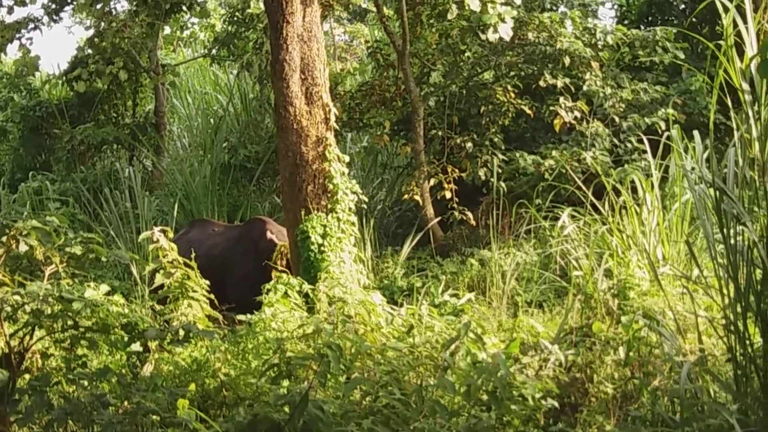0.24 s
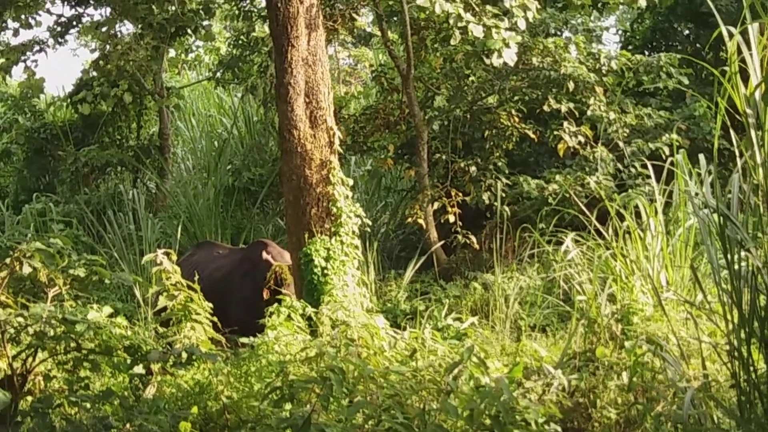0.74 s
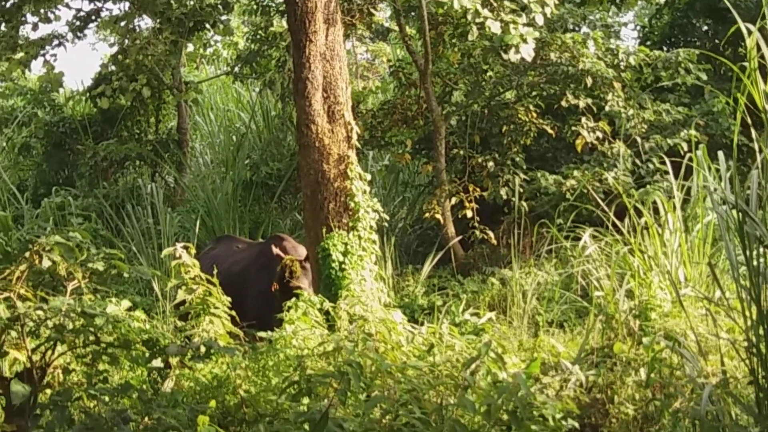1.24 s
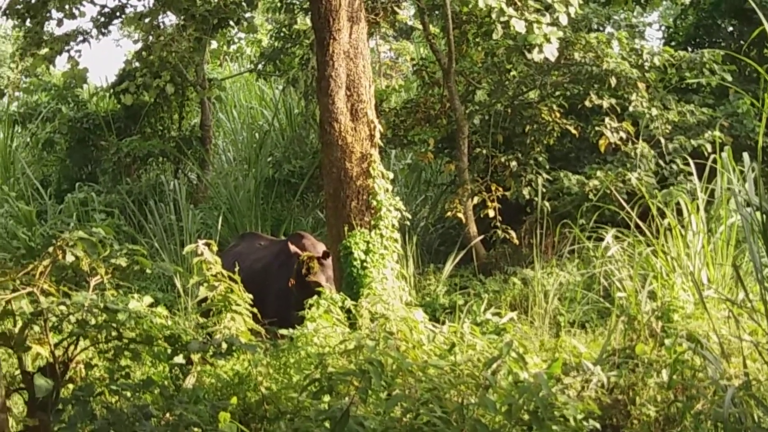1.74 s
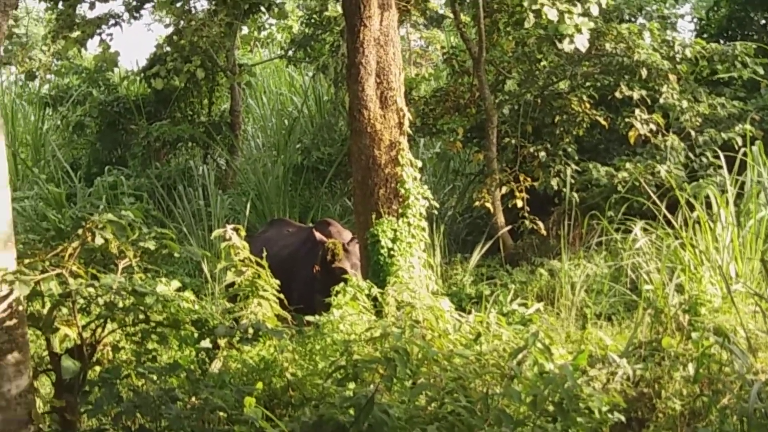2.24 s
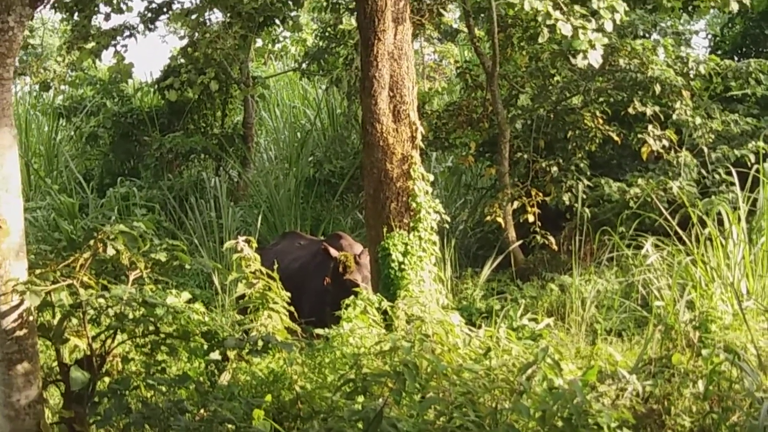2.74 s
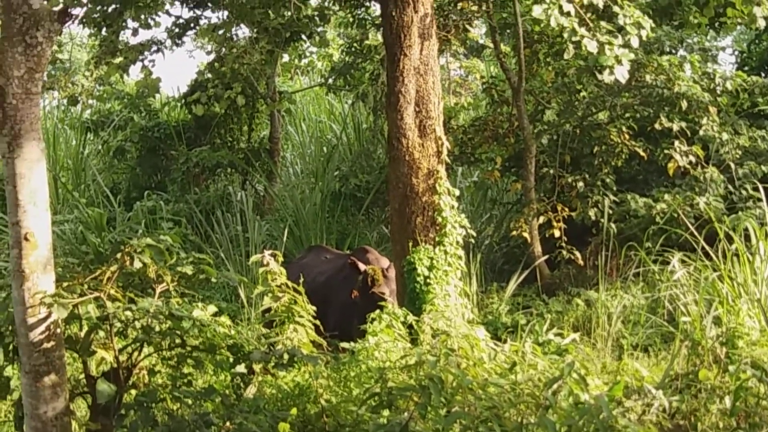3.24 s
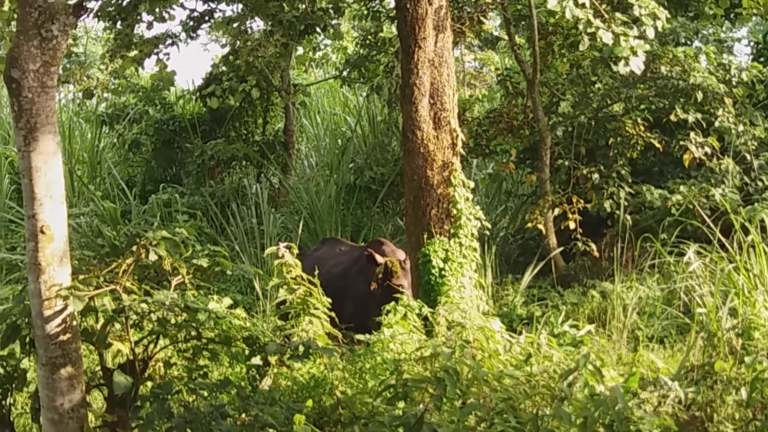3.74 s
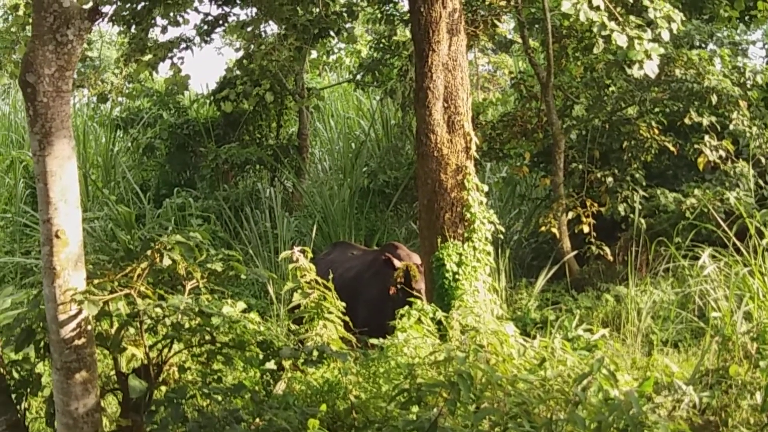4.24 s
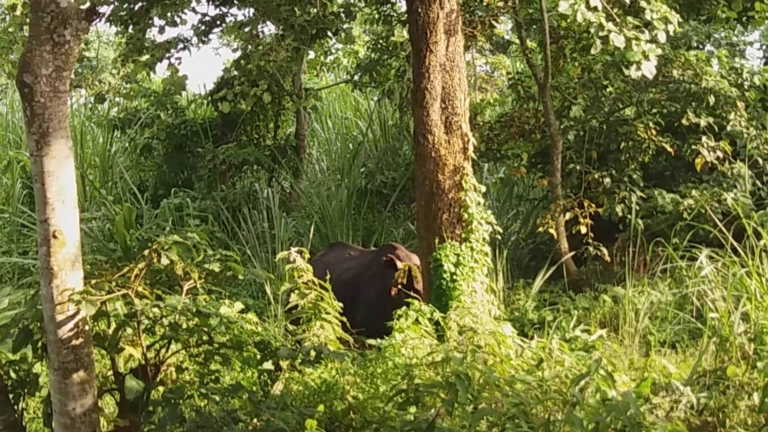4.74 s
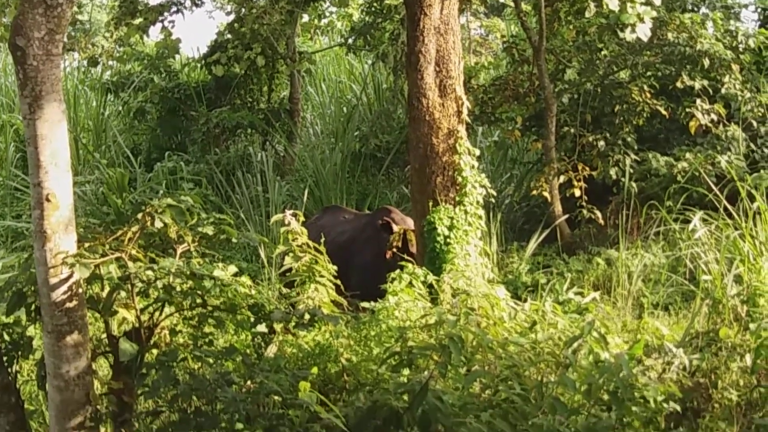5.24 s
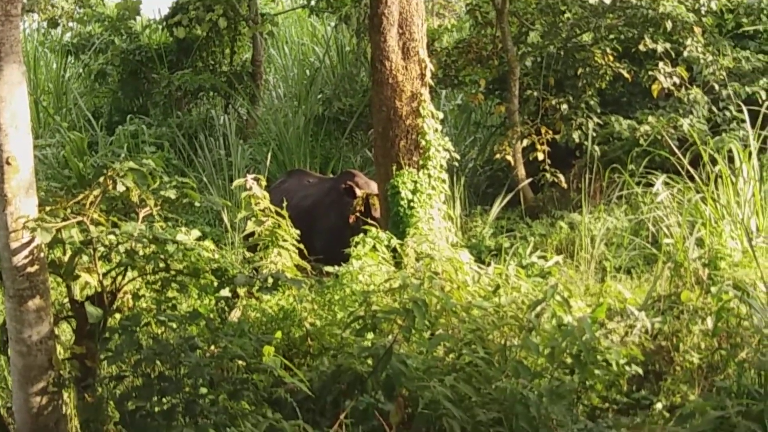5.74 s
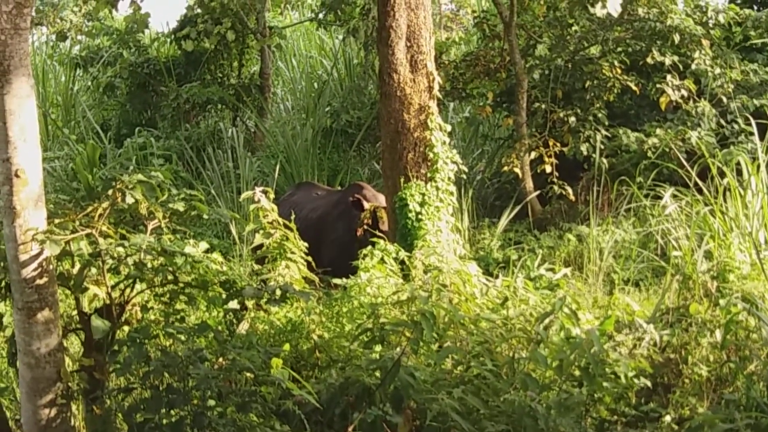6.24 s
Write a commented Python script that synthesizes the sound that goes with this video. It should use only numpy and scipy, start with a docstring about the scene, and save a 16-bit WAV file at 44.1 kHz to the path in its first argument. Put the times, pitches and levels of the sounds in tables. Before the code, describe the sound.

A high insect drone swells in quick bursts as short gliding whistles and far twitters echo lightly through a forest. Twice, a bird gives hoarse clucks, a sinking chuckle and three rising whoops, with faint long coos behind it. A short leaf rustle and a thin cricket note join in. Soft handling thumps touch the microphone, ending with a click near five seconds, while the birds and insects carry on.

```python
"""A forest edge full of birds. From the start, air rumbles, far birds twitter, insects shrill in surges
of quick bursts, and whistled notes scatter among the trees. A far coo joins in, then one bird clucks and
runs through a dry chuckle into three whoops. During the chuckle the hand-held camera takes the first of
five soft bumps. Leaves rustle, a cricket fades in and other birds chirp at an even pace. The chuckle and
whoops come again, and at 5 seconds the last bump lands with a click."""
import sys
import numpy as np
from scipy import signal
from scipy.fft import rfft, irfft, next_fast_len
from scipy.io import wavfile
from scipy.ndimage import uniform_filter1d

SR = 44100
rng = np.random.default_rng(int(sys.argv[2]) if len(sys.argv) > 2 else 0)


def int16_out(signal):
    """Quantize to a 16-bit WAV file."""
    q = np.round(np.clip(np.atleast_2d(signal).T, -1, 1) * 32767)
    wavfile.write(sys.argv[1], SR, q.astype(np.int16))


N = 286209
TIME = np.arange(N) / SR


def gain(db):
    """Turn decibels into a number to multiply a sound by."""
    return 10 ** (np.asarray(db) / 20)


def unit(x):
    """Scale a sound so that its average strength (rms) is 1."""
    return x / np.sqrt(np.mean(x ** 2) + 1e-30)


def add(track, start, sound):
    """Mix a sound into a track at a start time in seconds."""
    i = int(np.clip(start * SR, 0, N))
    track[i:i + len(sound)] += sound[:N - i]


def progress(seconds):
    """Count from 0 to 1 over a note; this ramp is called u below."""
    return np.linspace(0, 1, max(int(seconds * SR), 16))


def wobble(per_second, size):
    """A smooth random wiggle, mostly between -1 and 1."""
    step = max(int(SR / per_second), 1)
    points = rng.standard_normal(size // step + 2)
    joined = np.interp(np.arange(size) / step, np.arange(len(points)), points)
    return 1.2 * uniform_filter1d(joined, step // 2 + 1)


def band(x, hz, width_hz):
    """Keep the part of a sound near one pitch, scaled to strength 1."""
    size = next_fast_len(len(x))
    freqs = np.fft.rfftfreq(size, 1 / SR)
    bell = 1 / (1 + ((freqs - hz) / width_hz) ** 2) ** 2
    return unit(irfft(rfft(x, size) * bell, size)[:len(x)])


def noise(hz, width_hz, size):
    """Hiss around one pitch; the narrower it is, the more it sounds like a note."""
    return band(rng.standard_normal(size), hz, width_hz)


def trees(sound, tail_s=.65):
    """Trunks and leaves scatter a sound: thick early echoes, then a long thin tail."""
    t = np.arange(SR) / SR
    decay = gain(-60 * t / tail_s) + 1.2 * np.exp(-t / .035)
    fade_in = 1 - np.exp(-t / .004)
    echo = rng.standard_normal(SR) * decay * fade_in
    return signal.fftconvolve(sound, echo / np.linalg.norm(echo))[:N]


# The tone of the air. Each row: frequency in Hz, relative level in dB.
AIR_TONE = [(25, -56), (38, -44), (52, -4), (75, 0.5), (110, -0.5), (160, -5.5), (300, -12), (500, -15.5),
            (1000, -21.5), (1600, -16), (3800, -19), (5200, -19.5), (12000, -24), (15500, -23)]

def air(level_db=-57.5):
    """Moving air rumbles low under a faint, even hiss of leaves."""
    hz, db = np.transpose(AIR_TONE)
    freqs = np.fft.rfftfreq(N, 1 / SR)
    tone = gain(np.interp(np.log(freqs + 1), np.log(hz), db))
    return gain(level_db) * unit(irfft(rfft(rng.standard_normal(N)) * tone, N))


def flock(centre_hz, octaves, count):
    """Many far chirps of random pitch, glide and length, smeared by the trees."""
    chirps = np.zeros(N)
    for when, pitch, slope, length in rng.random((count, 4)):
        u = progress(.0295 + .0511 * length)
        hz = centre_hz * 2 ** (octaves * (pitch - .5) + .412 * (slope - .5) * (u - .5))
        add(chirps, when * N / SR, np.sin(np.pi * u) * np.sin(2 * np.pi * np.cumsum(hz) / SR))
    return unit(trees(chirps))


# How the far song, twitter and low wash swell and fade. Each row: time in seconds, relative level in dB.
SONG_LEVELS = [(0.0, -50), (0.2, -61.5), (0.34, -52.5), (0.5, -51), (0.7, -57), (0.99, -61), (1.25, -59),
               (1.72, -56.5), (2.48, -55), (3.07, -51), (3.42, -55), (4.05, -59.5), (4.28, -56),
               (4.97, -60.5), (5.3, -58), (5.46, -60), (6.27, -63), (6.49, -61)]
TWITTER_LEVELS = [(0.0, -59), (0.32, -63), (0.72, -71), (0.94, -68), (1.14, -59), (1.64, -67), (1.97, -60),
                  (2.35, -66.5), (2.71, -61.5), (3.8, -60), (3.98, -62), (4.25, -59), (6.34, -75),
                  (6.49, -66)]
LOW_WASH_LEVELS = [(0.0, -56), (0.29, -67), (0.65, -65), (0.98, -60.5), (1.21, -60.5), (3.25, -63),
                   (3.7, -60), (5.11, -67), (6.49, -73)]

def far_birds(song_hz=2500, twitter_hz=3600, low_hz=950):
    """Countless far chirps and twitters blur over a low wash of forest echo that swells and fades."""
    song = unit(flock(song_hz, octaves=.75, count=700) + gain(-1) * noise(song_hz, 850, N))
    song *= gain(np.interp(TIME, *np.transpose(SONG_LEVELS)) - .5)
    twitter = unit(flock(twitter_hz, octaves=.35, count=400) + noise(twitter_hz, 1430, N))
    twitter *= gain(np.interp(TIME, *np.transpose(TWITTER_LEVELS)) - 3)
    low_wash = noise(low_hz, 1020, N)
    low_wash *= gain(np.interp(TIME, *np.transpose(LOW_WASH_LEVELS)) - 2)
    return song + twitter + low_wash


# The bands of hiss in the insect drone. Each row: pitch in Hz, width in Hz, relative level in dB.
DRONE_BANDS = [(7055, 680, -2), (7620, 220, -6.5), (6980, 200, -9.5), (6310, 200, -18), (8930, 630, -20.5),
               (9400, 380, -22.5), (10660, 800, -16.5), (7970, 140, -17)]
# Surges of the nearest insects.
# Each row: first burst, end and time between bursts in seconds, then relative level in dB.
INSECT_SURGES = [(0.059, .41, 0.097, -52.5), (.69, 1.06, 0.11, -52), (1.358, 1.66, 0.082, -52),
                 (1.845, 2.197, 0.093, -53), (2.451, 2.79, 0.097, -51), (2.939, 3.474, 0.092, -51.5),
                 (3.561, 4.17, .095, -52), (4.335, 4.78, .087, -50.5), (5.148, 5.497, .079, -50),
                 (5.65, 6.03, .083, -52), (6.288, 6.53, 0.093, -52)]

def insects(burst_s=.08, burst_hz=7200, drone_db=-52, lift_db=2, rise_s=.26):
    """Many insects blur into a drone; the nearest shrill about ten times a second."""
    shrill, overtone, surging = np.zeros((3, N))
    u = progress(burst_s)
    for first, end, period, db in INSECT_SURGES:
        surging[(TIME > first) & (TIME < end)] = 1
        for middle in np.arange(first, end, period):
            swell = gain(db + 3 + rng.standard_normal()) * np.sin(np.pi * u)
            hz = burst_hz + 140 * rng.standard_normal()
            add(shrill, middle - burst_s / 2, swell * noise(hz, 800, len(u)))
            add(overtone, middle - burst_s / 2, swell * noise(13300, 1200, len(u)))
    drone = sum(gain(db) * noise(hz, width_hz, N) for hz, width_hz, db in DRONE_BANDS)
    # The whole drone lifts with every surge.
    drone *= gain(drone_db + lift_db * uniform_filter1d(surging, int(rise_s * SR)))
    shrill = signal.sosfilt(signal.butter(4, [6400, 8050], "bandpass", fs=SR, output="sos"), shrill)
    flicker = gain(wobble(350, N))
    return (drone + shrill + gain(-26) * overtone) * flicker


# The nearer whistled notes. Each row: start and length in seconds, first and last pitch in Hz,
# relative level in dB, share sent through the trees from 0 to 1.
WHISTLED_NOTES = [ (0.017, 0.025, 3700, 4160, -59, 0.23), (0.092, 0.049, 2700, 2955, -47, .8),
                  (0.15, 0.046, 2566, 3130, -42.5, 0.75), (0.323, 0.028, 1795, 2180, -49, .25),
                  (0.361, 0.022, 2190, 1900, -51, 0.1), (0.388, 0.011, 4250, 3650, -51, .4),
                  (.4, 0.059, 2490, 2846, -43.5, 0.37), (0.449, 0.079, 2450, 2250, -52.5, 0.85),
                  (0.493, 0.15, 2775, 2620, -53.5, 0.78), (.537, 0.037, 3600, 3260, -56.5, 0.52),
                  (0.825, 0.046, 3040, 2906, -52.5, 0.2), (.93, 0.042, 2800, 3260, -46.5, 0.47),
                  (1.01, 0.027, 3450, 3780, -57, .5), (1.014, 0.051, 3400, 3110, -54.5, 0.67),
                  (1.195, 0.036, 2710, 2500, -53, 0.4), (1.196, 0.093, 3070, 3730, -57, 0.6),
                  (1.234, .08, 3980, 4030, -59, 0.3), (1.28, 0.058, 3270, 2770, -52.5, 0.85),
                  (1.433, .12, 1862, 2340, -55, .6), (1.519, 0.047, 3920, 3760, -57, 0.4),
                  (1.6, 0.067, 3020, 2973, -49, 0.01), (1.655, 0.1, 2754, 2664, -49, 0.62),
                  (2.01, 0.066, 1830, 2530, -51.5, 0.44), (2.142, 0.064, 2387, 2420, -56, 0.27),
                  (2.218, 0.037, 2105, 1885, -53.5, 0.22), (2.291, 0.063, 2490, 2096, -52, 0.68),
                  (2.345, .085, 3750, 3800, -60, 0), (2.557, 0.059, 1837, 1695, -58.5, 0.42),
                  (2.698, 0.061, 3340, 3500, -55, .6), (3.022, 0.053, 3093, 2630, -46.5, 0.6),
                  (3.073, 0.08, 2520, 2714, -47, 0.52), (3.078, 0.037, 1890, 1865, -56.5, 0),
                  (3.147, 0.051, 1930, 1674, -54.5, 0.3), (3.286, .031, 2100, 2690, -51, 0.44),
                  (3.515, 0.074, 4000, 3934, -58, 0.5), (3.645, 0.024, 2200, 2630, -51.5, .4),
                  (3.713, 0.048, 3100, 2133, -47.5, 0.38), (3.716, 0.18, 3860, 3910, -62, 0.2),
                  (3.903, .041, 2220, 2180, -50, 0.06), (4.089, 0.055, 2290, 2172, -51, 0.17),
                  (4.099, 0.022, 2515, 2780, -50, 0.6), (4.161, 0.061, 3766, 2460, -46, 0.45),
                  (4.29, 0.044, 2370, 2203, -50, 0.23), (4.671, 0.039, 2397, 2780, -51.5, 0.65),
                  (5.089, 0.061, 2896, 2836, -52, .25), (5.143, 0.081, 2580, 2535, -51, 0.4),
                  (5.309, 0.083, 3113, 2703, -55, 0.84), (5.328, 0.071, 2550, 2343, -57, 0.6),
                  (5.663, 0.057, 2400, 2715, -56.5, 0.66), (5.722, 0.056, 3755, 3200, -62, 0.53),
                  (5.815, 0.077, 4025, 3220, -57.5, 0.42), (6.429, 0.013, 2700, 3780, -48.5, .25)]

def whistlers(ease=1.3):
    """Birds whistle gliding notes; far ones sound raspier and arrive mostly scattered."""
    direct, scattered = np.zeros((2, N))
    for start, length, first_hz, last_hz, db, share in WHISTLED_NOTES:
        u = progress(length)
        hz = last_hz + (first_hz - last_hz) * (1 - u) ** ease  # glides fast, then settles
        hz *= 1 + (.008 + .044 * share) * wobble(500, len(u))
        swell = np.sqrt(np.abs(np.sin(np.pi * u)))
        flutter = gain(5 * share * wobble(250, len(u)))
        note = gain(db) * unit(swell * flutter * np.sin(2 * np.pi * np.cumsum(hz) / SR))
        add(direct, start, note * np.sqrt(1 - share))
        add(scattered, start, note * np.sqrt(share))
    return gain(-1) * direct + gain(1) * trees(scattered)


# The highest insect's runs. Each row: first stroke and end in seconds, pitch in Hz, level in dB.
STROKE_RUNS = [(.2, 2.25, 10820, -69), (2.4, 4.55, 10940, -63), (5.1, 6.5, 10950, -69)]

def high_insect(stroke_s=.254, glide_hz=260):
    """One more insect saws out thin strokes, each rising a little in pitch."""
    out, u = np.zeros(N), progress(stroke_s)
    for first, end, hz, db in STROKE_RUNS:
        tone = np.sin(2 * np.pi * np.cumsum(hz + glide_hz * (u - .5)) / SR)
        for middle in np.arange(first, end, stroke_s):
            stroke = unit(noise(0, 330, len(u)) * tone)
            add(out, middle - stroke_s / 2, gain(db) * np.sin(np.pi * u) * stroke)
    return out


# Long coos. Each row: start and length in seconds, pitch aimed for in Hz, opening level in dB.
FAR_COOS = [(.54, .95, 733.6, -61), (1.95, 1.5, 745, -65), (3.352, 2.05, 778, -66),
            (5.624, 0.81, 775, -65.5)]

def cooer(scoop_hz=180.1, rise_s=.08, sag_hz=135.9, fade_db=4, scatter_db=-8):
    """A far bird scoops up to a long coo that sags and fades, blurred by the forest."""
    out = np.zeros(N)
    for start, length, aim_hz, db in FAR_COOS:
        u = progress(length)
        hz = aim_hz - scoop_hz * np.exp(-u * length / rise_s) - sag_hz * u
        hz *= 1 + .02496 * wobble(40.17, len(u))
        blur = 1 + noise(0, 95, len(u))
        voice = unit(blur * np.sin(2 * np.pi * np.cumsum(hz) / SR))
        add(out, start, gain(db - fade_db * u) * signal.windows.tukey(len(u), .1) * voice)
    return (out + gain(scatter_db) * trees(out)) / np.hypot(1, gain(scatter_db))


def croak(length, hz, pulse_hz=165, under_db=-10):
    """Uneven pulses from a bird's voice box ring its throat, with a weaker ring an octave below."""
    size = len(progress(length))
    pulses = np.cumsum(pulse_hz * (1 + .2 * wobble(200, size))) / SR
    age = pulses % 1 / pulse_hz  # roughly the seconds since the last pulse
    ring = np.sqrt(age) * np.exp(-age / .005)
    throat = band(ring * np.sin(2 * np.pi * hz * age), hz, 420)
    rasp = .55 * noise(hz, 330, size)
    under = gain(under_db) * band(ring * np.sin(np.pi * hz * age), 647, 160)
    return unit((throat + rasp + under) * signal.windows.tukey(size, .2))


# The clucks before each chuckle. Each row: start in seconds, length in seconds, level in dB.
OPENING_CLUCKS = [(0.614, 0.028, -53.5), (0.772, 0.045, -52.5), (0.837, 0.03, -49), (2.69, 0.042, -60),
                  (2.838, 0.04, -54), (2.905, 0.039, -52.5)]
# The chuckles. Each row: start in seconds, end in seconds, level in dB.
CHUCKLE_RUNS = [(0.993, 1.44, -53.5), (3.103, 3.48, -55)]

def chuckler(cluck_hz=1316, first_hz=1100, last_hz=738, sink_s=.055, period_s=.068, note_s=.026):
    """A bird gives a few hoarse clucks, then an even run of dry notes that sink in pitch."""
    out = np.zeros(N)
    for start, length, db in OPENING_CLUCKS:
        add(out, start, gain(db) * croak(length, cluck_hz))
    for start, end, db in CHUCKLE_RUNS:
        for age in np.arange(0, end - start, period_s):
            hz = last_hz + (first_hz - last_hz) * np.exp(-age / sink_s)
            add(out, start + age, gain(db) * croak(note_s, hz))
    return out


# Bumps on the camera. Each row: start in seconds, thud pitch in Hz, thud, knock and click levels in dB.
CAMERA_BUMPS = [(1.192, 105, -47.5, -44, -48), (2.611, 106, -47, -53, -68), (4.189, 97, -50.5, -50.5, -70),
                (4.479, 101, -52, -48, -59), (4.998, 101, -45, -44.5, -40)]

def bumps(thud_s=.009, knock_s=.0061, click_s=.00377, click_hz=1200):
    """A finger clicks on the case, which knocks dully, and the camera body thuds briefly."""
    out, t, u = np.zeros(N), np.arange(SR // 8) / SR, progress(click_s)
    for start, hz, thud_db, knock_db, click_db in CAMERA_BUMPS:
        thud = -t / thud_s * np.exp(1 - t / thud_s) * np.sin(2 * np.pi * hz * t)
        knock = np.exp(-t / knock_s) * noise(180, 420, len(t))
        click = np.sin(2 * np.pi * click_hz * click_s * u) + .14 * rng.standard_normal(len(u))
        add(out, start, gain(thud_db) * thud + gain(knock_db) * knock)
        add(out, start - click_s / 2, gain(click_db) * np.sin(np.pi * u) ** 2 * click)
    return out


# The whoops after each chuckle. Each row: start and length in seconds, first and top pitch in Hz,
# relative level in dB, and how strongly the odd harmonics are mixed in, in dB.
WHOOP_NOTES = [(1.496, 0.067, 662, 907, -42, -15), (1.774, 0.081, 599, 1036, -43, -18),
               (2.192, 0.033, 687, 990, -41, -29), (3.517, 0.076, 675, 901, -43.5, -11.5),
               (3.804, .072, 603, 1056, -42.5, -20), (4.191, .047, 736, 976, -44, -28)]

def whooper(crest=.671, last_hz=832, throat_hz=965, yelp_hz=1130, yelp_lead_s=.012):
    """Each whoop arches up to where the bird's throat rings, then breaks into a hoarse yelp."""
    out = np.zeros(N)
    for start, length, first_hz, top_hz, db, odd_db in WHOOP_NOTES:
        u = progress(length)
        rise = first_hz + (top_hz - first_hz) * np.sin(np.pi / 2 * u / crest)
        fall = top_hz + (last_hz - top_hz) * ((u - crest) / (1 - crest)) ** 2
        hz = np.where(u < crest, rise, fall) * (1 + .03 * wobble(400, len(u)))
        # The throat favours the second harmonic, so the voice itself runs at half the listed pitch.
        phase = np.pi * np.cumsum(hz) / SR
        throat = 1 / np.hypot(1, (hz - throat_hz) / 170)
        swell_db = np.interp(u, [0, .6, .8, 1], [-10, -5, 1, -1]) + 2 * wobble(300, len(u))
        swell = np.sqrt(2) * gain(db + swell_db) * signal.windows.tukey(len(u), .15)
        odd_harmonics = gain(odd_db) * (np.sin(3 * phase) + .35 * np.sin(phase))
        rasp = gain(-18) * noise(740, 350, len(u))
        add(out, start, swell * (throat * np.sin(2 * phase) + odd_harmonics + rasp))
        yelp = croak(.035, yelp_hz, pulse_hz=189.7, under_db=-17)
        add(out, start + length - yelp_lead_s, gain(db - 6.5) * yelp)
    return out


# Rustling leaves. Each row: start and length in seconds, pitch and width of the hiss in Hz, level in dB.
LEAF_RUSTLES = [(1.774, .12, 2500, 2360, -49), (1.796, 0.16, 9000, 9000, -61),
                (1.965, .066, 3350, 1800, -51), (4.471, .04, 2200, 2200, -58)]

def rustles():
    """Leaves rustle in short swells of hiss."""
    out = np.zeros(N)
    for start, length, hz, width_hz, db in LEAF_RUSTLES:
        u = progress(length)
        add(out, start, gain(db) * np.sin(np.pi * u) * noise(hz, width_hz, len(u)))
    return out


def cricket(hz=4595):
    """A far cricket fades in, holds one thin note and dies away."""
    db = np.interp(TIME, [1.8, 3.6, 5.8, 6.3], [-85, -73, -72, -82])
    return gain(db) * noise(hz, 60, N)


# Runs of chirps. Each row: start, end, time between chirps and chirp length in seconds,
# then pitch, pitch step per chirp and width in Hz, then first and last relative level in dB.
CHIRP_RUNS = [(2.11, 3.45, .197, 0.14, 4144, 13, 282, -63.5, -55.5),
              (2.7, 3.0, 0.18, 0.18, 8360, -190, 150, -56.5, -59),
              (4.31, 4.95, .182, 0.033, 3910, 0, 140, -57, -59),
              (4.485, 4.95, 0.19, 0.029, 2305, 0, 260, -51, -53)]

def chirpers():
    """Birds repeat one buzzy chirp evenly, growing louder or softer; the trees ring on in between."""
    out = np.zeros(N)
    for start, end, period, length, hz, step_hz, width_hz, first_db, last_db in CHIRP_RUNS:
        u, times = progress(length), np.arange(start, end, period)
        for k, db in enumerate(np.linspace(first_db, last_db, len(times))):
            buzz = noise(hz + k * step_hz, width_hz, len(u))
            add(out, times[k], gain(db) * np.sin(np.pi * u) * buzz)
    return gain(-2) * out + gain(-3) * trees(out)


def scene():
    """Air, birds, insects, leaves and bumps all meet at one microphone."""
    background = air() + far_birds() + insects() + whistlers() + high_insect() + cooer()
    main_bird = chuckler() + whooper()
    main_bird += gain(-6) * trees(main_bird)
    return (background + main_bird + bumps() + rustles() + cricket() + chirpers())[None]


def record(dry, top_hz=15600):
    """The camera steeply cuts off the highest treble."""
    return signal.sosfilt(signal.ellip(12, .1, 80, top_hz, fs=SR, output="sos"), dry)


dry = scene()
out = record(dry)
int16_out(out)
```